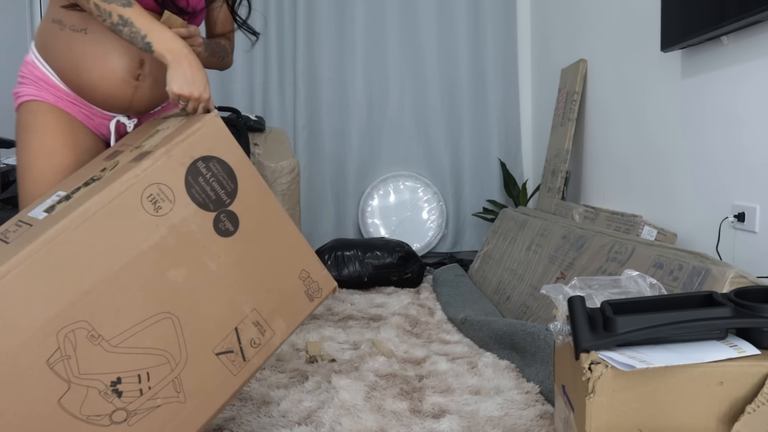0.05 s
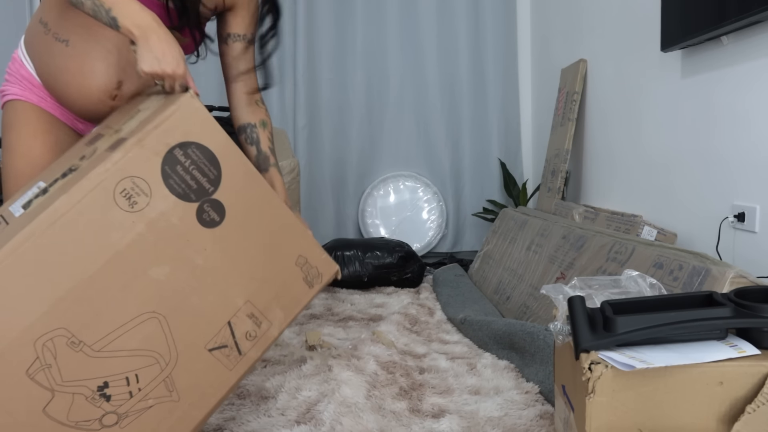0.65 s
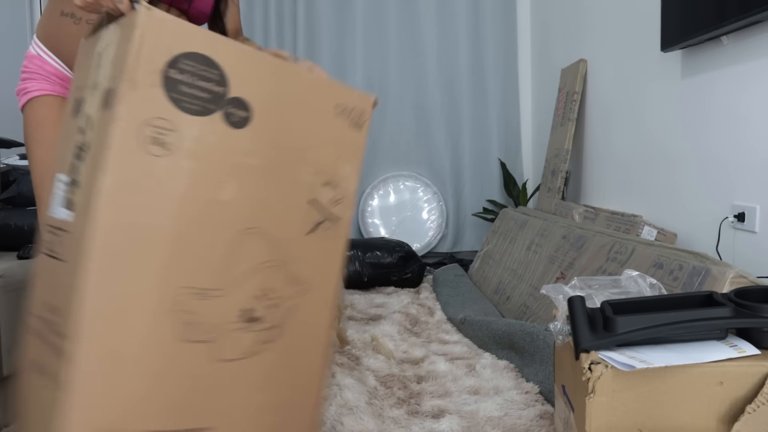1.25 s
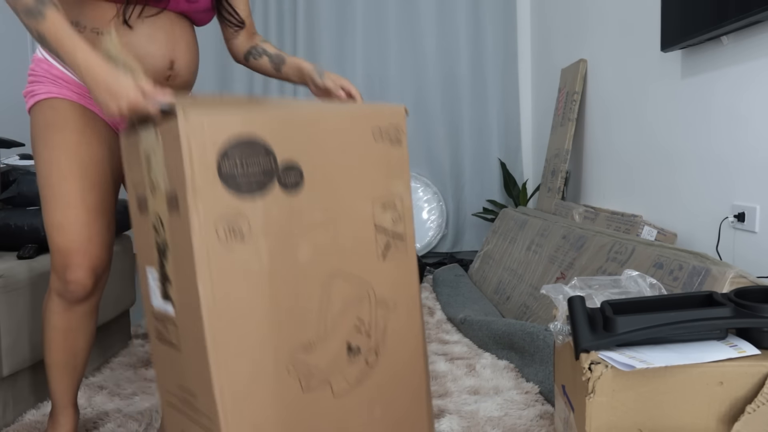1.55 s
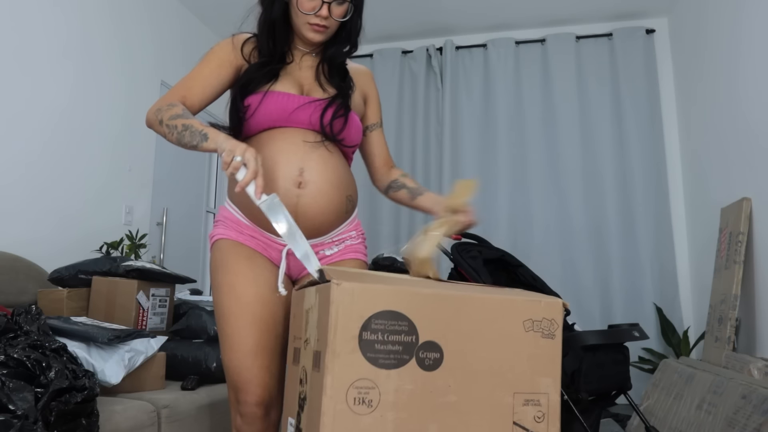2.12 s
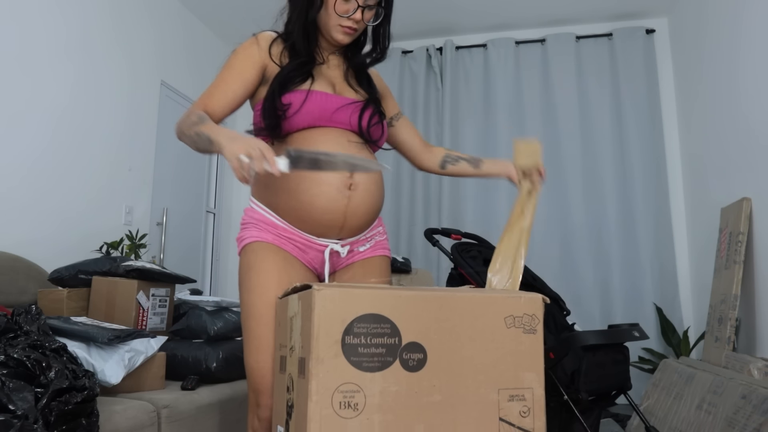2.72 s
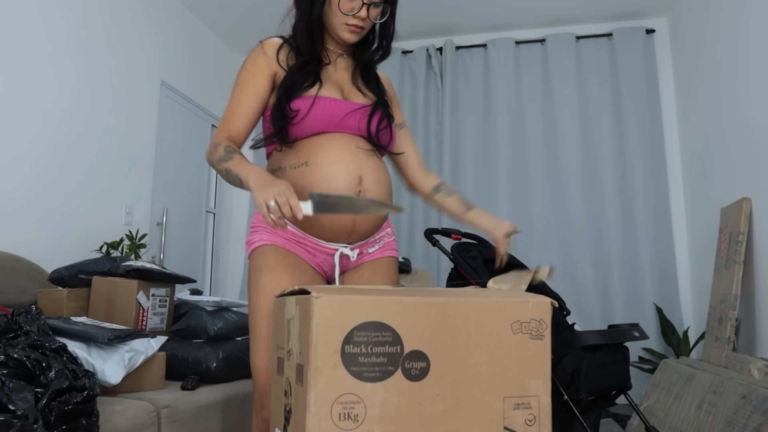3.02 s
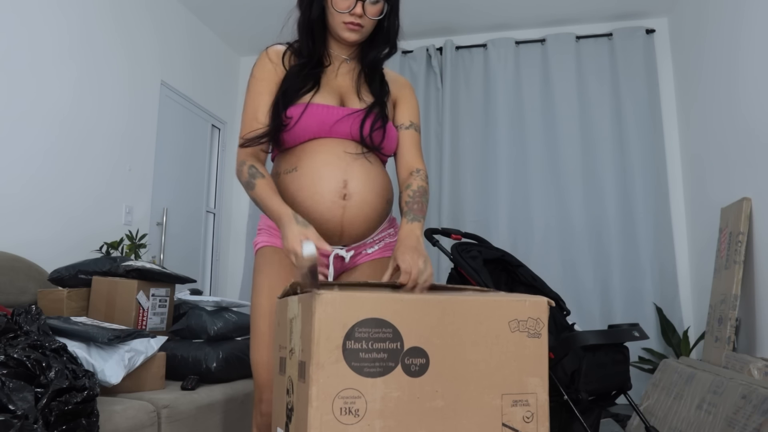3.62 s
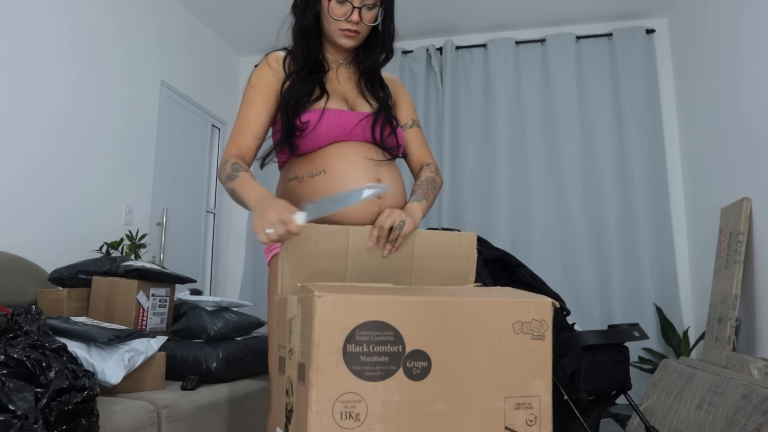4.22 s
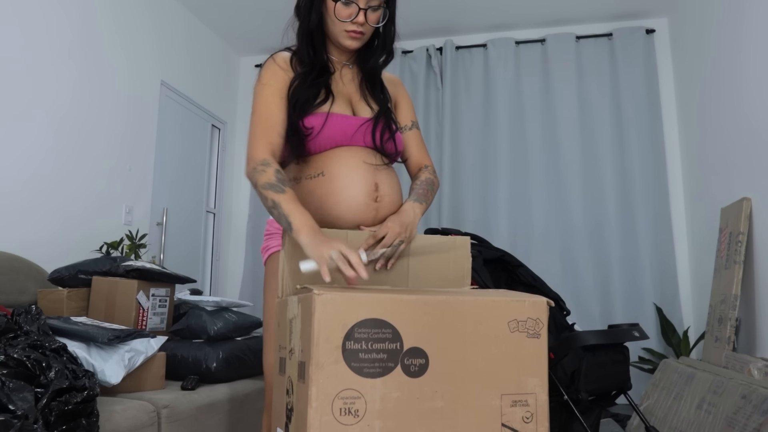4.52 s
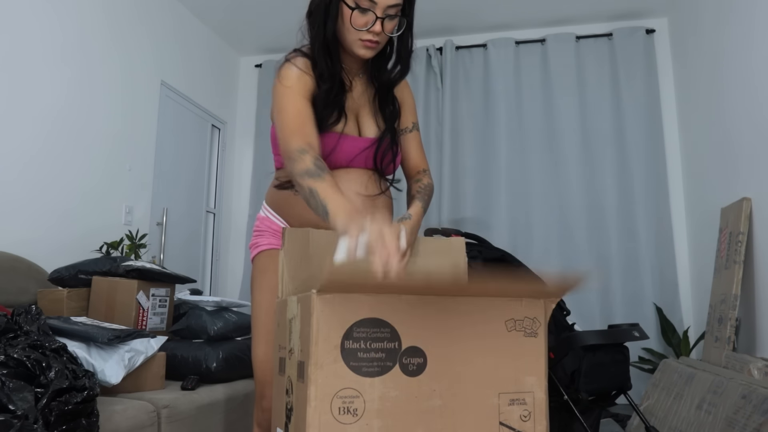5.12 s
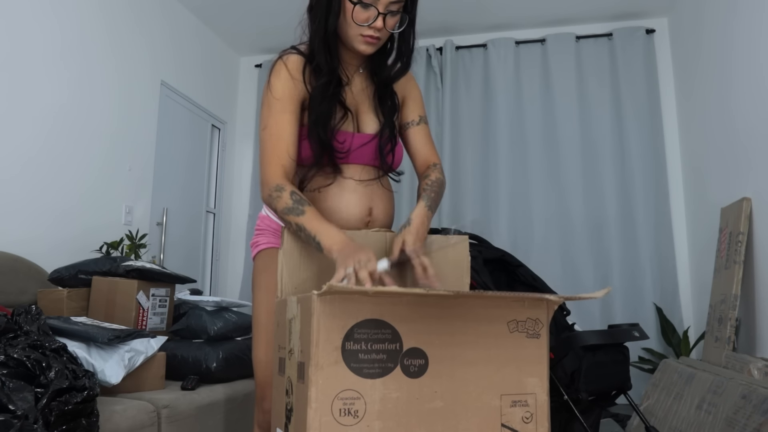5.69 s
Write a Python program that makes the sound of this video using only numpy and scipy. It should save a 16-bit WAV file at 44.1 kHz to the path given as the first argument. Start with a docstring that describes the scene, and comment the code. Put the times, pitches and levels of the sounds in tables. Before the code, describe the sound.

A large cardboard box is handled close by in a small room with short reverb, quiet air and a faint low hum. For the first half second, hands pat and rub the board with light crackles. Around 0.9 seconds the box slides softly over a rug, then rocks upright with a cluster of muffled thuds from 1.3 to 1.4 seconds. Hollow pats come at 1.7. From 1.8 to 2.9 seconds packing tape rips off in several rasping tugs, with sharp snaps near 2.2. Softer pats and rubbing follow, with a crack at 3.7. At about 4.1 seconds the flaps burst open with a brief tear, a loud crack and a hollow boom, the loudest moment. A knife blade clinks faintly at 4.4. Quick swipes brush the cardboard until a flap snaps back sharply along its crease at 5.3. Light rubbing and a pat close near 5.9 seconds.

```python
"""Opening a big cardboard box

In a small living room a box scrapes over a rug and is tipped upright with muffled thuds. Packing tape
rips off in tugs, its glue letting go in tiny snaps. Hands pat and rub the board, the flaps burst open
with a hollow boom, a knife clinks and a flap snaps back along its crease. Each scrape and blow sounds
through the box's panels; short reverb, quiet air and a faint hum sit behind."""
import sys
import numpy as np
from scipy import signal
from scipy.fft import rfft, irfft
from scipy.io import wavfile
from scipy.ndimage import uniform_filter1d, minimum_filter1d

SR = 44100
rng = np.random.default_rng(int(sys.argv[2]) if len(sys.argv) > 2 else 0)


def wrap_up_sound(samples):
    """Save the sound to the file named by the first command line argument, as 16-bit audio."""
    columns = np.atleast_2d(samples).T
    # keep every value between -1 and 1, then stretch to whole-number steps
    tamed = np.clip(columns, -1, 1)
    steps = np.round(tamed * 32767).astype(np.int16)
    wavfile.write(sys.argv[1], SR, steps)


N = 262395
TIME = np.arange(N) / SR
BASS_HZ, TREBLE_HZ = 400, 3000  # crossovers

# Cue levels are relative: each source sets its own band gains on top.
# tugs on the tape, the last two as the flaps burst open:
# (time [s], length [s], level [dB], attack [s], treble [dB])
TAPE_TUGS = [(1.838, 0.11, -23.5, 0.0028, 0), (2.062, 0.084, -31, 0.031, 1.5),
             (2.199, 0.01, -22.5, 0.09, 0), (2.273, 0.089, -23, 0.045, 0), (2.558, 0.084, -30, 0.076, -0.5),
             (2.685, 0.015, -29.5, 0.086, 1), (2.771, 0.033, -41, .02, 1.5), (2.918, .005, -42.5, .05, 3),
             (4.077, 0.025, -28.5, 0.0086, -10.5), (4.102, 0.0099, -29.5, 0.018, -0.5)]
# creases and tape giving way: (time [s], level [dB], treble [dB], decay [s], panel pitch [Hz])
CREASE_CRACKS = [(0.052, -24, -1, 0.0056, 1390), (0.121, -23, -4.5, 0.001, 571),
                 (0.172, -24.5, -11, 0.011, 1720), (0.335, -20.5, 7, 0.0015, 487),
                 (0.663, -29, 6, .003, 501), (0.829, -26.5, 3, 0.0017, 1340), (1.313, -31, 6, 0.0016, 900),
                 (1.549, -30, 0.5, 0.0058, 2930), (2.203, -6.5, 0.5, 0.0042, 1200),
                 (2.279, -10, 1, 0.00082, 2500), (3.033, -27, -12, 0.0048, 700), (3.413, -38, 3, .004, 900),
                 (3.699, -15.5, -1, 0.0032, 1770), (3.949, -28, -26, 0.0045, 923),
                 (4.062, -6, -9, 0.005, 905), (4.094, -17, 1, 0.0029, 3000),
                 (4.107, 3.5, -9.5, 0.0015, 773), (4.407, -39.5, 16.5, 0.0016, 2980),
                 (5.231, -22, -0.5, 0.0019, 552), (5.317, -1.5, -12.5, 0.0021, 1140)]
# the box rocks down onto the rug, edge after edge: (time [s], level [dB], panel pitch [Hz])
EDGE_LANDINGS = [(1.279, -19, 209), (1.288, -12.5, 457), (1.3, -16.5, 450), (1.314, -15, 390),
                 (1.368, -15.5, 420), (1.425, -22, 250), (1.435, -9, 700)]
# hands pat and grip the board: (time [s], level [dB], treble [dB], panel pitch [Hz])
HAND_PATS = [(0.012, -31.5, -26, 194), (0.125, -23.5, -36, 1200), (0.336, -24, 0.5, 317),
             (0.592, -30.5, -17, 430), (1.163, -23.5, -26, 450), (1.721, -23.5, -4, 228),
             (1.736, -22, -6, 205), (1.759, -16, -17, 287), (3.087, -30.5, -17, 285),
             (3.413, -29.5, -11.5, 196), (3.443, -32.5, -28, 208), (3.532, -29.5, -10, 188),
             (3.712, -22.5, -5.5, 210), (4.158, -15, -18, 350), (4.637, -22, -21, 257),
             (4.651, -21, -17.5, 280), (5.24, -31.5, -17, 236), (5.849, -24, -15.5, 460)]
# shoves that make the box boom: (time [s], level [dB])
BOX_SHOVES = [(0.63, -38.5), (1.719, -25), (2.35, -30), (2.681, -37), (3.731, -34), (4.113, -19.5),
              (4.162, -19.5)]
# hands and flaps shifting on the board: (time [s], length [s], level [dB], bass [dB], treble [dB])
HAND_RUBS = [(0.018, 0.32, -49, 4.5, -2.5), (0.608, 0.033, -51.5, 6, 1.5), (1.306, 0.099, -44.5, -7, -13),
             (1.552, 0.088, -64, -5, 9.5), (1.727, 0.042, -45.5, 8, -1), (3.017, 0.077, -52, -2, -12),
             (3.444, .18, -50, 1.5, -3), (3.641, 0.19, -52.5, 3.5, -0.5), (3.9, 0.26, -49, -1.5, -2.5),
             (4.154, 0.13, -48, 6, -9), (4.31, 0.17, -54.5, 2.5, -0.5), (4.75, 0.28, -52.5, 1, -8),
             (5.09, .16, -51.5, -7, -6), (5.417, 0.046, -53, -3, -0.5), (5.836, .11, -54.5, 7, -0.5)]
# skin and flaps brushing past: (peak time [s], level [dB], swell and fade time [s], scrape pitch [Hz])
QUICK_SWIPES = [(0.227, -25.5, 0.0072, 840), (0.306, -23.5, 0.004, 5330), (0.342, -27.5, 0.019, 6860),
                (0.424, -39.5, 0.061, 7340), (1.799, -18, 0.0072, 851), (3.546, -27.5, 0.015, 813),
                (3.661, -26, 0.0043, 4000), (3.914, -35, 0.0086, 1460), (4.338, -30, 0.0066, 775),
                (4.622, -35.5, 0.014, 2000), (4.757, -23, 0.011, 1930), (4.798, -26.5, 0.0062, 1480),
                (4.874, -29, 0.0037, 1790), (4.951, -28.5, 0.026, 1270), (5.128, -26.5, 0.0077, 5960),
                (5.233, -20, 0.012, 966), (5.688, -43, 0.019, 2500), (5.934, -40.5, 0.014, 5190)]

# resonances of the cardboard panels: (frequency [Hz], bandwidth [Hz], level [dB])
PANEL_MODES = [(130, 4, 0), (206, 67, -22), (338, 7.7, 2.5), (456.4, 15, -6), (571.6, 16, -4),
               (780, 107, -8.5), (950, 88, -15), (1750, 73, -22)]
# low modes of the whole box and the air inside: (frequency [Hz], level [dB], t60 [s])
BOX_MODES = [(37.7, -11.5, 0.26), (70.9, -9.5, 0.96), (76.6, -4.5, 0.44), (99, -0.5, 0.15), (156, -15, 0.1)]
# modes of the knife blade: (frequency [Hz], level [dB], t60 [s])
BLADE_MODES = [(2900, -17, 0.062), (2920, 12, 0.018), (3220, 12, 0.019), (3280, -8, .05)]

# tone of peeling tape: (frequency [Hz], level [dB])
TAPE_EQ = [(24, -41), (40, -11), (194, 8.5), (329, 2.5), (363, -1), (585, -8.5), (646, -9.5), (918, -5.5),
           (1090, -9), (1720, -7.5), (2150, -10), (9220, -14), (11000, -22.5), (14800, -19), (16000, -47.5)]
# tone of snapping fibres: (frequency [Hz], level [dB])
SNAP_EQ = [(24, -39.5), (40, -21), (312, -6.5), (1300, -10), (1850, -9), (2770, -10), (4030, -4),
           (4800, -2.5), (7730, -2.5), (16000, -18.5)]
# tone of a dull blow on the box: (frequency [Hz], level [dB])
THUD_EQ = [(24, -41.5), (40, -12), (199, 2), (680, -7), (896, -9), (1760, -13.5), (9940, -33.5),
           (16000, -40.5)]
# tone of cardboard sliding on the rug: (frequency [Hz], level [dB])
RUG_EQ = [(24, -51), (40, -6), (220, 9), (305, -9), (422, -14), (810, -19.5), (1340, -17.5), (4340, -24.5),
          (6020, -22.5), (14500, -33.5), (16000, -43)]
# tone of skin rubbing cardboard: (frequency [Hz], level [dB])
RUB_EQ = [(24, -46), (40, -4.5), (231, -2), (372, -7.5), (942, -7.5), (1120, -10.5), (1760, -9.5),
          (4030, -19.5), (6020, -18), (13100, -30.5), (16000, -35.5)]
# tone of the room's air: (frequency [Hz], level [dB])
AIR_EQ = [(15, -25.5), (25, -12), (43, -2), (87, -3), (130, -22.5), (190, -13.5), (607, -25), (775, -24),
          (1190, -29.5), (14800, -37.5), (16000, -51)]

# reflections off nearby surfaces: (delay [s], level [dB])
EARLY_ECHOES = [(.0024, -33), (.0043, -31.5)]
# reverb time of the room: (frequency [Hz], t60 [s])
ROOM_DECAY = [(100, 0.31), (260, 0.46), (700, 0.23), (1840, 0.25), (4850, 0.2), (14000, 0.17)]


def tape_rip():
    """Glue lets go in a dense stream of tiny snaps, and the lid acts as a sounding board."""
    glue = slips(per_s=6000, spread_db=5.5, catch_hz=200, catch_db=2.5)
    tugs = [stroke(s, length, db, attack, release_s=0.12, grab_db=3, treble_db=high)
            for s, length, db, attack, high in TAPE_TUGS]
    return friction(tugs, glue, TAPE_EQ, bass_db=-6, middle_db=-1, treble_db=-0.5, fade_s=0.0037)


def cracks():
    """Creases and tape give way in sharp snaps with little bass."""
    hits = [(s, db, -16.5, high, decay, hz) for s, db, high, decay, hz in CREASE_CRACKS]
    return blows(hits, SNAP_EQ, push_db=4, hardness=0.17, crush_db=-6, crush_hz=5130, rise_s=0.00095,
                 panel_db=1.5, panel_q=0.7, bass_db=4, middle_db=-1.5, treble_db=-4.5, sizzle_db=1.5)


def thuds():
    """Dull blows: the box lands, muffled by the rug, and hands pat it. Lower panels give more bass."""
    landings = [(s, db, -31.5, hz) for s, db, hz in EDGE_LANDINGS]  # one treble cut for every edge
    hits = []
    for cues, low_db, decay_s in (landings, -2.5, 0.0045), (HAND_PATS, -3, 0.012):
        hits += [(s, db, low_db - 12 * np.log2(hz / 200), high, decay_s, hz) for s, db, high, hz in cues]
    return blows(hits, THUD_EQ, push_db=15.5, hardness=0.63, crush_db=-9, crush_hz=5030, rise_s=0.00086,
                 panel_db=5, panel_q=3, bass_db=7.5, middle_db=-2.5, treble_db=0.5, sizzle_db=16)


def booms():
    """The walls of the box swing in and out after a shove: a hollow boom."""
    out, boom = np.zeros(N), ring(BOX_MODES)
    for s, db in BOX_SHOVES:
        add(out, s, undb(db) * boom)
    return out


def rug_drag():
    """The box slides in one long push, catching and slipping on the pile."""
    pile = slips(per_s=15000, spread_db=2, catch_hz=120, catch_db=2.5)
    push = stroke(s=0.86, length_s=0.26, db=-40.5, attack_s=0.35, release_s=0.41, grab_db=2)
    return friction([push], pile, RUG_EQ, bass_db=-5.5, middle_db=0.5, treble_db=-1.5, fade_s=0.022)


def handling():
    """Skin sticks and slips on the board while stray fibres and scraps of tape tick at random."""
    moves = [stroke(s, length, db, attack_s=0.052, release_s=0.14, grab_db=1.5,
                    bass_db=low, treble_db=high) for s, length, db, low, high in HAND_RUBS]
    skin = slips(per_s=2800, spread_db=5, catch_hz=70, catch_db=1.8)
    ticks = slips(per_s=83, spread_db=4, catch_hz=20, catch_db=2)
    rub = friction(moves, skin, RUB_EQ, bass_db=-1, middle_db=0, treble_db=-2, fade_s=0.008)
    crinkle = friction(moves, ticks, SNAP_EQ, bass_db=-21, middle_db=-17, treble_db=-8, fade_s=0.008)
    return rub + crinkle


def swipes():
    """Quick rubs swell and fade, each at its own pitch; higher ones are brighter."""
    rub = board(slips(per_s=9000, spread_db=3, catch_hz=200, catch_db=1.2), RUB_EQ)
    out = np.zeros(N)
    for s, db, swell_s, hz in QUICK_SWIPES:
        bright_db = -8.5 + 4 * np.log2(hz / 1000)
        _, middle, treble = bands(rub + undb(-6) * resonance(rub, hz, q=2.4))
        scrape = undb(-12) * middle + undb(bright_db - 8) * sizzle(treble, bright_db)
        swell = np.exp(-np.abs(TIME - s) / swell_s)
        out += undb(db) * swell * scrape
    return out


def knife_clink(time_s=4.425, level_db=-43.5):
    """A light touch rings the blade."""
    out = np.zeros(N)
    add(out, time_s, undb(level_db) * ring(BLADE_MODES))
    return out


def slips(per_s, spread_db, catch_hz, catch_db):
    """Tiny releases of glue or fibre, uneven in size, bunched as the contact catches and lets go."""
    happens = rng.random(N) < per_s / SR
    sizes = undb(spread_db * np.clip(rng.standard_normal(N), -2, 2))
    signs = rng.choice([-1, 1], N)
    return unit(happens * sizes * signs * undb(catch_db * wander(catch_hz)))


def stroke(s, length_s, db, attack_s, release_s, grab_db, bass_db=0, treble_db=0):
    """A slide builds, grabs, eases and lets go: (time [s], level [dB], bass [dB], treble [dB]) points."""
    floor_db, end = db - 25, s + length_s
    envelope = [(s - attack_s, floor_db), (s, db + grab_db), (s + 0.62 * length_s, db),
                (end, db), (end + release_s, floor_db)]
    return [(t, level, bass_db, treble_db) for t, level in envelope]


def friction(strokes, force, eq, bass_db, middle_db, treble_db, fade_s):
    """Slips shake the board; each stroke rides the level, with its own share of bass and treble."""
    bass, middle, treble = bands(board(force, eq))
    out = np.zeros(N)
    for points in strokes:
        times, *curves = np.transpose(points)
        db, low, high = (np.interp(TIME, times, curve) for curve in curves)
        inside_s = np.minimum(TIME - times[0], times[-1] - TIME)
        contact = np.clip(inside_s / fade_s + 1, 0, 1)
        scrape = undb(middle_db) * middle + undb(low + bass_db) * bass + undb(high + treble_db) * treble
        out += contact * undb(db) * scrape
    return out


def blows(hits, eq, push_db, hardness, crush_db, crush_hz, rise_s, panel_db, panel_q,
          bass_db, middle_db, treble_db, sizzle_db):
    """Each blow is one sharp push and a dying burst of crushed fibres; the struck panel rings briefly."""
    out, t = np.zeros(N), TIME[:SR // 4]
    for s, db, low, high, decay_s, hz in hits:
        crush = signal.lfilter(*signal.butter(1, crush_hz, fs=SR), rng.standard_normal(len(t)))
        force = undb(crush_db) * crush * (1 - np.exp(-t / rise_s)) * np.exp(-t / decay_s)
        force[0] += undb(push_db + hardness * db)  # the harder the blow, the more push over crush
        force += undb(panel_db) * resonance(force, hz, panel_q)
        bass, middle, treble = bands(board(force, eq))
        body = undb(middle_db) * middle + undb(low + bass_db) * bass
        edge = undb(high + treble_db) * sizzle(treble, high + sizzle_db)
        add(out, s, undb(db) * (body + edge) / np.abs(middle).max())
    return out


def board(force, eq):
    """A force on the cardboard sounds directly and through the panel resonances."""
    panels = sum(undb(db) * resonance(force, hz, hz / width) for hz, width, db in PANEL_MODES)
    return colour(force + panels, eq)


def sizzle(treble, db):
    """The brighter a contact, the higher its treble reaches."""
    return unit(treble + undb(db) * np.diff(treble, prepend=0))


def ring(modes):
    """Struck modes die away freely as damped sines."""
    t = TIME[:SR]
    return sum(undb(db - 60 * t / t60) * np.sin(2 * np.pi * hz * t) for hz, db, t60 in modes)


def resonance(x, hz, q):
    """Band-pass with gain 1 at the centre."""
    return signal.lfilter(*signal.iirpeak(hz, q, fs=SR), x)


def bands(x):
    """Bass, middle and treble of a sound, each at rms 1."""
    edges = (BASS_HZ, "low"), ([BASS_HZ, TREBLE_HZ], "band"), (TREBLE_HZ, "high")
    return [unit(signal.sosfilt(signal.butter(3, hz, kind, fs=SR, output="sos"), x))
            for hz, kind in edges]


def colour(x, eq, size=4096):
    """Minimum-phase EQ: nothing rings ahead of a transient."""
    gain = undb(on_log(np.fft.rfftfreq(size, 1 / SR), eq))
    cepstrum = irfft(np.log(gain))
    cepstrum[1:size // 2] *= 2
    cepstrum[size // 2 + 1:] = 0
    impulse = irfft(np.exp(rfft(cepstrum)))
    return signal.fftconvolve(x, impulse)[:len(x)]


def on_log(hz, points):
    """Read (frequency [Hz], value) points on a logarithmic frequency axis."""
    frequencies, values = np.transpose(points)
    return np.interp(np.log(hz + 1), np.log(frequencies), values)


def wander(rate_hz):
    """Smooth random drift at rms 1."""
    hold = int(SR / rate_hz)
    steps = np.repeat(rng.standard_normal(N // hold + 1), hold)
    return unit(uniform_filter1d(steps, hold)[:N])


def undb(db):
    """Decibels to gain."""
    return 10 ** (np.asarray(db) / 20)


def unit(x):
    """Scale to rms 1."""
    return x / np.sqrt(np.mean(x ** 2))


def add(out, s, x):
    """Mix x into out from time s."""
    i = max(int(s * SR), 0)
    out[i:i + len(x)] += x[:max(len(out) - i, 0)]


def room_reverb(send, build_s=0.0043, block=1536):
    """Two near echoes and a diffuse tail, drawn afresh each block as if the box and hands moved."""
    hz, t, _ = signal.stft(TIME[:SR // 2], SR)
    decay = undb(-60 * t / on_log(hz, ROOM_DECAY)[:, None])
    out = np.zeros(N)
    for s, db in EARLY_ECHOES:
        add(out, s, undb(db) * send)
    for start in range(0, N, block):
        phases = np.exp(2j * np.pi * rng.random(decay.shape))
        tail = signal.istft(phases * decay, SR)[1]
        tail *= 1 - np.exp(-(TIME[:len(tail)] / build_s) ** 2)
        add(out, start / SR, signal.fftconvolve(send[start:start + block], tail / np.linalg.norm(tail)))
    return out


def room_tone(air_db=-56.5, hum_db=-61, hum_hz=67.3):
    """A bed of quiet air and a faint, wavering hum."""
    air = undb(air_db) * unit(colour(rng.standard_normal(N), AIR_EQ))
    hum = undb(hum_db + 4.9 * wander(rate_hz=1.6)) * np.sin(2 * np.pi * hum_hz * TIME)
    return air + hum


def scene():
    """The mono mix: tape, rug, hands, knife and blows feed the reverb; booms and room tone stay dry."""
    textures = rug_drag() + handling() + tape_rip()
    knocks, snaps = thuds(), cracks()
    details = swipes() + knife_clink()
    crisp = textures + snaps + details
    reverb = room_reverb(undb(-6.5) * crisp + undb(-8) * knocks)
    return (crisp + knocks + reverb + booms() + room_tone())[None]


def record(dry):
    """The microphone drops the deepest bass; a fast limiter holds the peaks; the top is cut."""
    ceiling, window, top_hz = 0.97, 129, 16200
    heard = signal.sosfilt(signal.butter(4, 30, "high", fs=SR, output="sos"), dry)
    gain = ceiling / np.maximum(np.abs(heard), ceiling)
    limited = heard * uniform_filter1d(minimum_filter1d(gain, size=window), size=window)
    return signal.sosfilt(signal.ellip(10, 0.1, 80, top_hz, fs=SR, output="sos"), limited)


dry = scene()
out = record(dry)
wrap_up_sound(out)
```